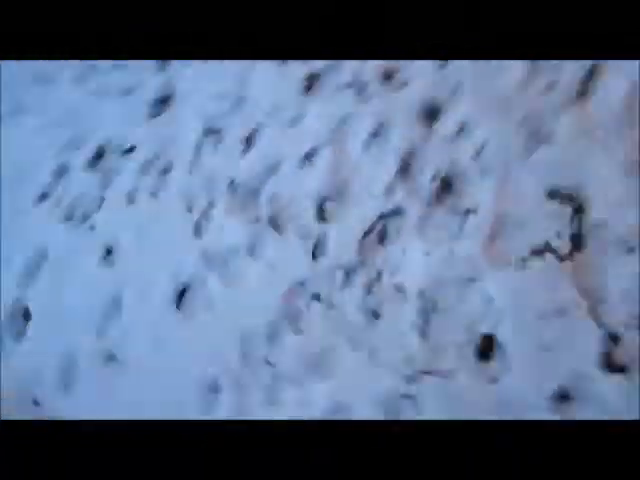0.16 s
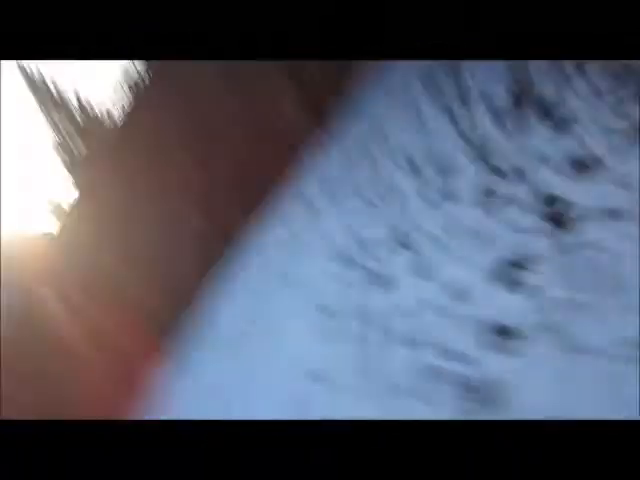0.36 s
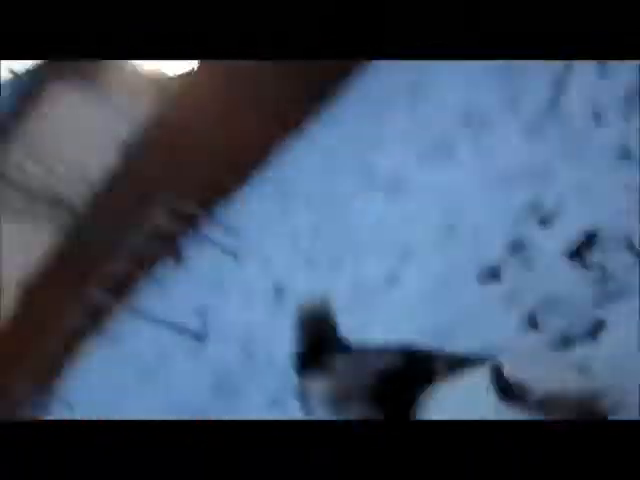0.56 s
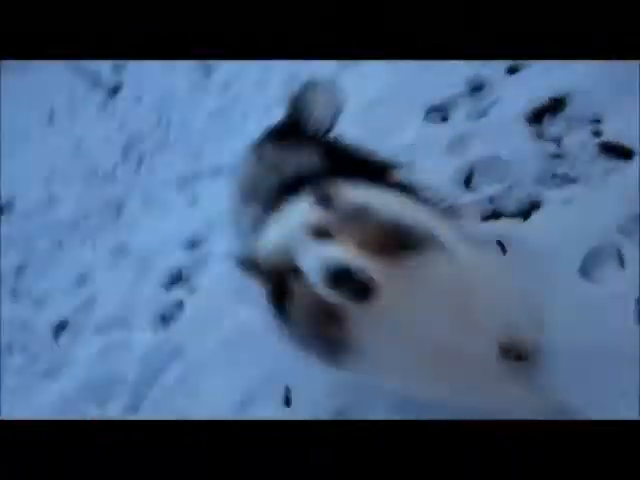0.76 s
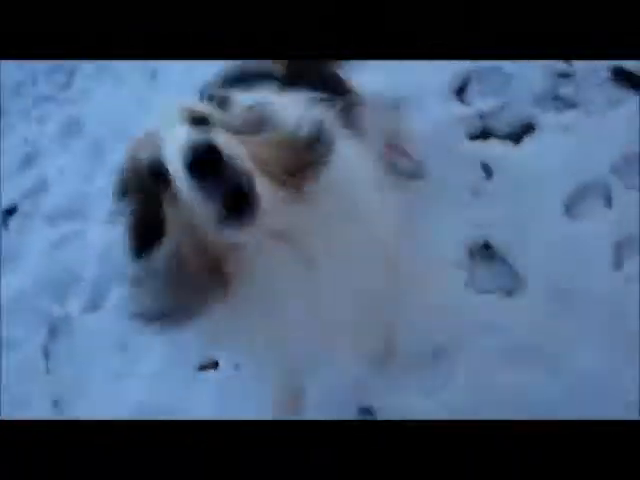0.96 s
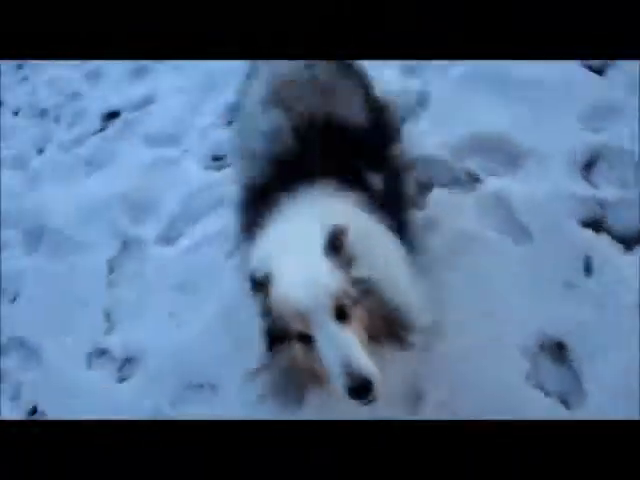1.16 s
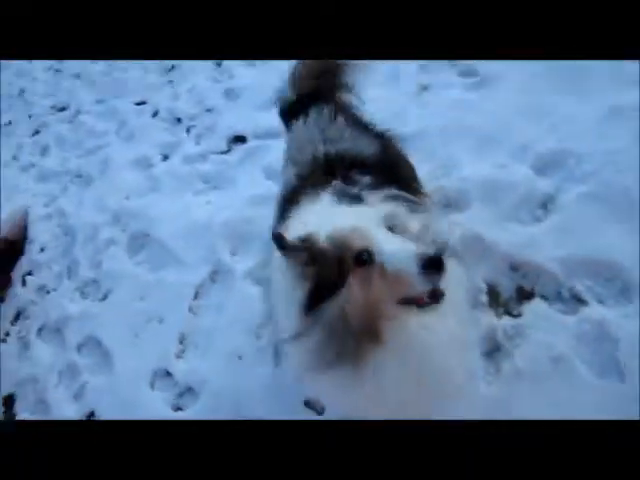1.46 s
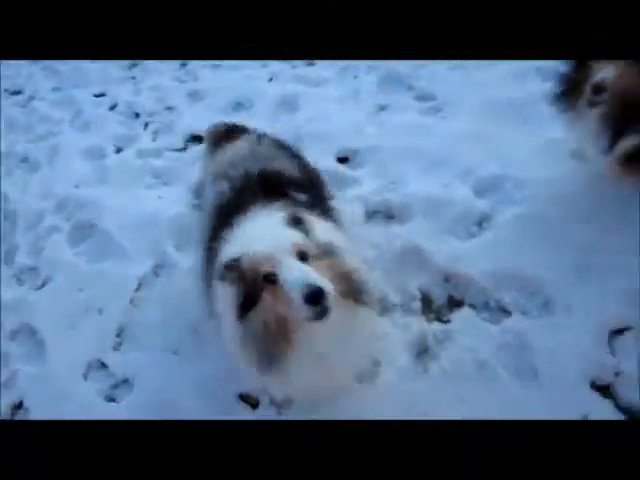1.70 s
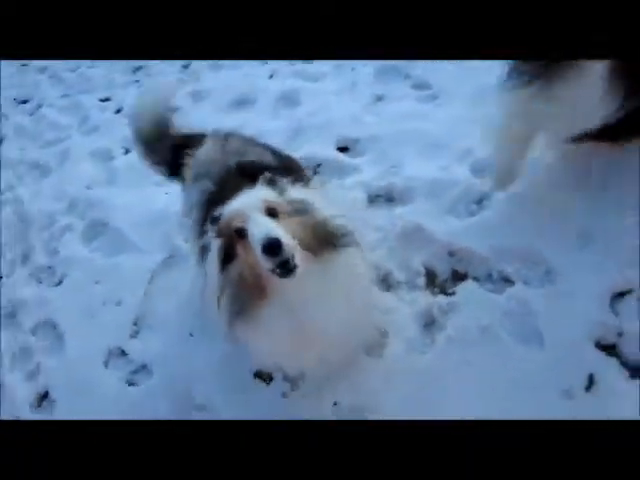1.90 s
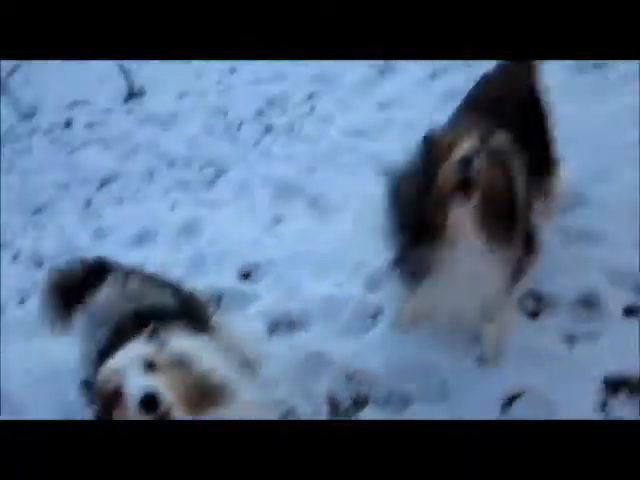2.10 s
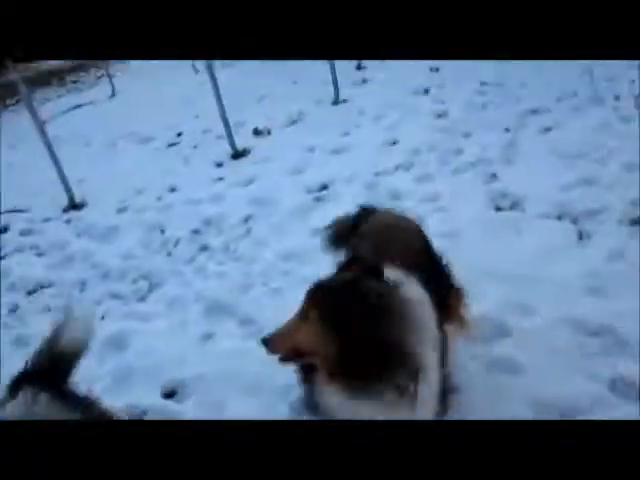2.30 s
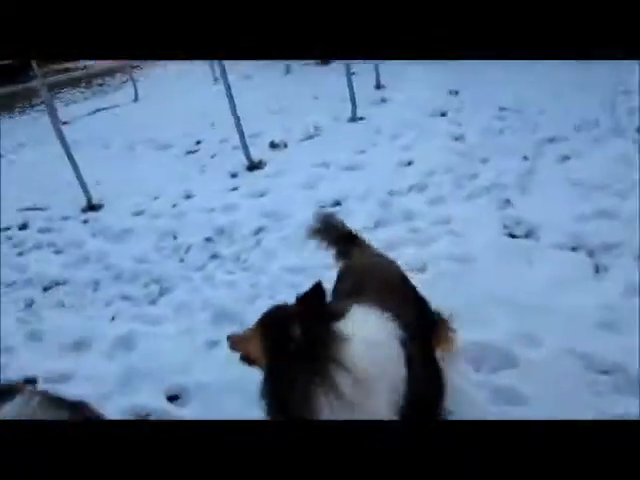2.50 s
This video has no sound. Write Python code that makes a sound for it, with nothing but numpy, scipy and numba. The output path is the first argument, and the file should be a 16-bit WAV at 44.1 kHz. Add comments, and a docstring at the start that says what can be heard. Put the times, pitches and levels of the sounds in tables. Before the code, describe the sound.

Two dogs bark close up in a snowy yard: a round, hooting bark at 0.1 s, answered by a sharper one at 0.25. A crunch at 0.6, a tiny rising whine at 0.8, then overlapping barks at 0.85 and 0.97. Soft knocks at 1.3, paired barks at 1.4 and 1.55, then 2.05 and 2.25. Faint crunching, ticks near 2.0 and 2.46, light echo, quiet air and hum.

```python
"""Two sheepdogs in a snowy yard

Two sheepdogs bark in turn, close to the microphone, the second cutting in on the first; one gives a short whine.
Each bark is a train of glottal pulses on an arch of pitch, roughened by jitter and breath, through a moving mouth.
Grainy noise crunches in short bursts and one longer faint stretch, with soft knocks and sharp ticks of noise.
House and fence send back a faint echo over still air and hum; the loudest barks overload the microphone."""
import sys
import numpy as np
from scipy import signal
from scipy.fft import rfft, irfft
from scipy.io import wavfile
from scipy.ndimage import uniform_filter1d
from numba import njit

SR = 44100
rng = np.random.default_rng(int(sys.argv[2]) if len(sys.argv) > 2 else 0)


def log_audio(samples):
    """Write samples as a 16-bit WAV file to the path given in sys.argv[1]."""
    # one column per channel
    frames = np.atleast_2d(samples).T
    # limit to full scale, then quantise
    limited = np.clip(frames, -1, 1)
    pcm = np.round(limited * 32767).astype(np.int16)
    wavfile.write(sys.argv[1], SR, pcm)


N = 116865
T = np.arange(N) / SR  # time in seconds
TOP_HZ = 15600  # upper limit of the voice harmonics and of the microphone

# Spectrum of the grainy noise, also tints the lingering ring: freq_hz, level_db
GRAIN_COLOUR = [(1200, -1), (8000, -15.5), (15000, -30.5)]
# Spectrum of the sound the yard sends back: freq_hz, level_db
YARD_COLOUR = [(550, -11.5), (1150, -3), (3000, -7), (12000, -10)]


def amp(db):
    """Decibels to gain."""
    return 10 ** (np.asarray(db) / 20)


def unit(x):
    """Scale to rms 1."""
    return x / np.sqrt(np.mean(x ** 2))


def colour(x, points):
    """Causal minimum-phase filter through the given (Hz, dB) points, built by folding the cepstrum."""
    hz, db = np.array(points).T
    size = 2048
    bins_hz = np.arange(size // 2 + 1) * SR / size
    curve_db = np.interp(np.log(bins_hz + 1), np.log(hz), db)
    cepstrum = irfft(np.log(amp(curve_db)))
    cepstrum[1:size // 2] *= 2
    cepstrum[size // 2 + 1:] = 0
    impulse = irfft(np.exp(rfft(cepstrum)))
    return signal.fftconvolve(x, impulse)[:len(x)]


def noise(points):
    """Coloured noise of rms 1."""
    return unit(colour(rng.standard_normal(N), points))


def wobble(hz):
    """Random motion: normal draws at the given rate, joined by straight lines."""
    return np.interp(T * hz, np.arange(N), rng.standard_normal(N))


@njit
def resonate(x, hz, width):
    """State-variable band-pass with a moving centre, gain 1 at the peak; width in Hz."""
    y, band, low = np.empty(len(x)), 0., 0.
    for i in range(len(x)):
        g = np.tan(np.pi * hz[i] / SR)
        damping = width / hz[i]
        v = (band + g * (x[i] - low)) / (1 + g * (g + damping))
        band = 2 * v - band
        low = low + 2 * g * v
        y[i] = damping * v
    return y


def background(air_db=-51.5, hum_db=-65.5, hum_hz=120, linger_db=-40, linger_s=1):
    """Still air, a faint sine hum and the ring of an earlier bark, dying away exponentially."""
    # Spectrum of the still air: freq_hz, level_db
    air_colour = [(100, -11.5), (1500, -5.5), (8000, -24.5), (15000, -31)]
    air = amp(air_db) * noise(air_colour)
    hum = amp(hum_db) * np.sqrt(2) * np.sin(2 * np.pi * hum_hz * T)
    ring = unit(colour(noise(YARD_COLOUR), GRAIN_COLOUR))
    return air + hum + amp(linger_db) * ring * np.exp(-T / linger_s)


def bark(rows, throat, mouth_db, width_hz):
    """Unsteady glottal pulses and breath ring two jaw-led resonances and a thin one that rises through the bark."""
    fade_s = 0.0055
    jitter, shimmer, hiss_db = 0.072, 0.58, 11.5  # pitch and strength wander, hiss, at full roughness
    doubling = 0.25  # strong and weak pulses alternate where the voice is rough
    pressed_db = -5.5  # the fundamental starts weak and fills in as the throat relaxes
    upper_ratio, upper_db = 1.71, -2.5  # second mouth resonance, centre relative to the first
    edge_hz, edge_db = 7600, 11.5  # thin high resonance, where it ends up
    dull_hz = 1900  # the treble of the voice lies above this

    times, *controls = np.array(rows).T
    on = (T > times[0] - fade_s) & (T < times[-1] + fade_s)
    t = T[on]
    remaining = np.interp(t, times[[0, -1]], [1, 0])
    pitch, level_db, rough, mouth, treble_db = (np.interp(t, times, c) for c in controls)
    rough = np.clip(rough, 0, 1)

    # Glottal pulses: a sum of harmonics on a jittering pitch
    unsteady_pitch = pitch * (1 + jitter * rough * wobble(420)[on])
    phase = 2 * np.pi * np.cumsum(unsteady_pitch) / SR
    k = np.arange(1, 48)[:, None]
    strengths = (k * pitch < TOP_HZ) * amp(pressed_db * remaining * (k == 1))
    pulses = unit(np.sum(np.cos(k * phase) * strengths, axis=0))
    pulses = pulses * (1 + doubling * rough * np.cos(phase / 2))
    pulses = pulses * (1 + shimmer * rough * wobble(500)[on])

    # Breath comes in puffs with the pulses; its brighter hiss is weighted toward the start of the bark
    air = rng.standard_normal(N)[on] * (1 + np.cos(phase) / 2)
    hiss = amp(hiss_db) * np.sqrt(rough * remaining) * np.diff(air, prepend=0)
    voice = pulses + rough * np.sqrt(rough) * air + hiss

    # Each resonance is added on top of the sound that enters it
    voice = voice + amp(mouth_db) * resonate(voice, mouth, float(width_hz))
    voice = voice + amp(upper_db) * resonate(voice, mouth * upper_ratio, 2. * width_hz)
    rising_edge_hz = edge_hz * (1 - 0.19 * remaining ** 2)
    voice = voice + amp(edge_db) * resonate(voice, rising_edge_hz, 460.0)
    voice = colour(voice, throat)

    body = signal.sosfiltfilt(signal.butter(4, dull_hz, fs=SR, output="sos"), voice)
    voice = body + amp(treble_db) * (voice - body)

    # Even out the running level, so that the level column alone shapes the loudness
    voice /= np.sqrt(uniform_filter1d(voice ** 2, size=400) + 1e-9)
    fade = np.clip(np.minimum(t - times[0], times[-1] - t) / fade_s + 1, 0, 1)
    out = np.zeros(N)
    out[on] = voice * amp(level_db) * fade
    return out


def round_dog():
    """The dog with a round, hooting voice: a strong, narrow mouth resonance."""
    # One list per bark: time_s, pitch_hz, level_db, roughness (0-1, clipped), mouth_hz, treble_db
    round_barks = [
        [(.112, 271.1, -30.5, 0.62, 550, -17), (.143, 375.4, -11, 0.25, 1040, -10.5),
         (.165, 480, -12, 0.05, 1010, 6.5), (.185, 496.9, -4.5, 0, 1024, -0.5),
         (.225, 506.6, -15.5, 0.11, 940, -4), (.243, 463, -19.5, .3, 833, 13.5), (.28, 246, -34, 0, 388, -20)],
        [(.965, 473, -15, 0, 950, 11.5), (.98, 462.4, -11.5, 0, 995, 1.5), (1.014, 507.2, -17.5, 0, 1240, 1),
         (1.03, 592, -18, 1.1, 780, -2.5), (1.052, 501, -34.5, 0.4, 530, 6.5)],
        [(1.397, 255.6, -32, 0.67, 510, 0), (1.43, 372, -17, 0.23, 973, 0.5),
         (1.458, 481.2, -10, 0.1, 1020, -1), (1.503, 505, -12.5, 0.14, 970, -6),
         (1.514, 496, -14, 0.67, 950, -12), (1.521, 660, -15, 0.35, 650, 5), (1.546, 569, -18.5, 0.2, 580, -14)],
        [(2.042, 262.9, -29, .5, 583, -6), (2.062, 334, -16.5, 0.31, 753, 5), (2.095, 464, -10, 0.14, 928, 4.5),
         (2.138, 489.6, -15, 0.13, 980, -7.5), (2.148, 523, -23, 0.56, 920, 12),
         (2.155, 650, -12.5, 0.27, 700, -5), (2.174, 578, -22, 0.27, 580, 1)],
    ]
    # Fixed colour of this throat: freq_hz, level_db
    round_throat = [(200, -5), (480, 0), (1000, -3), (1400, -8), (1750, -5), (2100, -12), (2450, -5),
                    (2950, -11), (3350, -26), (5500, -41), (9500, -37), (15000, -60)]
    return sum(bark(rows, round_throat, mouth_db=19.0, width_hz=170) for rows in round_barks)


def sharp_dog():
    """The dog with a sharper, harsher voice: a weaker, wider mouth resonance."""
    # One list per bark: time_s, pitch_hz, level_db, roughness (0-1, clipped), mouth_hz, treble_db
    sharp_barks = [
        [(.252, 413.8, -17, 0.099, 1320, -9.5), (.285, 524.5, -18, 0.23, 1740, 0.5),
         (.303, 597, -14.5, 0.17, 970, -5), (.338, 569, -19, 0.34, 756, -4.5), (.358, 458, -35, 1, 560, 5)],
        [(.85, 266.5, -27.5, 0.51, 550, 3.5), (.869, 316.8, -8, 0.22, 626, -12),
         (.877, 385, -14, 0.62, 1480, -13), (.9, 451.2, -9.5, 0.084, 1270, 0.5),
         (.95, 546.5, -7, 0.43, 1435, -11.5), (.962, 499.5, -10.5, 0.23, 530, -6),
         (.986, 360, -30, 0.28, 400, -32)],
        [(1.542, 330, -30.5, 0.47, 810, 6.5), (1.562, 424.6, -7, 0.11, 1330, -8),
         (1.58, 499.5, -13, 0.054, 1900, 1), (1.605, 534.7, -12.5, 0.14, 1110, 5.5),
         (1.636, 554.5, -9.5, 0.085, 970, -9), (1.655, 421, -27, 0.23, 750, 4),
         (1.685, 252, -42.5, 0.21, 511, -12)],
        [(2.245, 281.2, -37, 0.31, 590, -12), (2.264, 316.7, -15, 0.29, 630, -6.5),
         (2.273, 397.1, -17.5, 0.18, 1190, -0.5), (2.29, 467.2, -13.5, 0.24, 1780, -7.5),
         (2.317, 528, -14.5, 0.88, 756, -1.5), (2.329, 540, -10, 0.055, 1080, -16),
         (2.355, 529.5, -12, 0.036, 1020, -30), (2.372, 396.5, -30, 0.42, 840, -6),
         (2.412, 221.5, -45, .05, 300, -19)],
    ]
    # Fixed colour of this throat: freq_hz, level_db
    sharp_throat = [(200, -16.5), (540, 9), (1950, 0.5), (2250, -6.5), (2650, 4.5), (3050, -1.5),
                    (3400, -17), (10000, -26.5), (15000, -63)]
    return sum(bark(rows, sharp_throat, mouth_db=11, width_hz=420) for rows in sharp_barks)


def yard(x, t60_s=1, tail_db=-30):
    """Distinct echoes off house and fence, and a thin diffuse tail of decaying noise."""
    # Reflections from the house, then the fence: delay_s, level_db
    echo_rows = [(0.045, -15.5), (.14, -27)]
    echoes = sum(amp(db) * np.interp(T - s, T, x, left=0) for s, db in echo_rows)
    build_up = np.minimum(T / 0.1, 1)
    tail = noise(YARD_COLOUR) * amp(-60 * T / t60_s) * build_up
    diffuse = signal.fftconvolve(x, tail / np.linalg.norm(tail))[:N]
    return colour(echoes, YARD_COLOUR) + amp(tail_db) * diffuse


def crunches(grain_db=3, edge_s=0.004):
    """Grainy noise, rapidly swinging in level, in short bursts and one longer faint stretch."""
    # Stretches of grainy noise: start_s, length_s, level_db
    crunch_rows = [(0.622, 0.087, -40.5), (1.052, 0.22, -44), (1.646, 0.12, -44.5), (1.974, 0.46, -44.5)]
    level = 0
    for s, length, db in crunch_rows:
        level = level + amp(db) * np.clip(np.minimum(T - s, s + length - T) / edge_s + .5, 0, 1)
    return level * unit(noise(GRAIN_COLOUR) * amp(grain_db * wobble(750)))


def whine(overtone_db=-18):
    """A thin whistle with a weak octave that climbs, then sags slightly."""
    # Course of the whine: time_s, pitch_hz, level_db
    whine_rows = [(0.804, 922, -37.5), (0.83, 1242, -28.5), (0.866, 1182, -29.5)]
    times, hz, db = np.array(whine_rows).T
    phase = 2 * np.pi * np.cumsum(np.interp(T, times, hz)) / SR
    sounding = (T > times[0]) * (T < times[-1])
    level = uniform_filter1d(amp(np.interp(T, times, db)) * sounding, size=256)  # softened ends
    return np.sqrt(2) * level * (np.sin(phase) + amp(overtone_db) * np.sin(2 * phase))


def taps(rows, shape, decay_s):
    """Short contacts: coloured noise that starts at once and decays exponentially."""
    return noise(shape) * sum(amp(db) * (T >= s) * np.exp(-abs(T - s) / decay_s) for s, db in rows)


def knocks():
    """Soft, dull knocks: low-weighted noise dying within a few milliseconds."""
    # Knocks: start_s, level_db
    knock_rows = [(1.317, -28), (1.326, -30), (1.349, -37)]
    # Their spectrum: freq_hz, level_db
    knock_colour = [(200, -30), (720, -15), (12000, -57)]
    return taps(knock_rows, knock_colour, decay_s=0.0061)


def ticks():
    """Small sharp ticks: bright noise dying in about a millisecond."""
    # Ticks: start_s, level_db
    tick_rows = [(2.015, -36), (2.463, -28)]
    # Their spectrum: freq_hz, level_db
    tick_colour = [(8000, -3), (15000, -25)]
    return taps(tick_rows, tick_colour, decay_s=0.0011)


def scene():
    """Dogs and knocks set off the yard's echo; crunches, ticks and background reach the microphone without it."""
    echoing = round_dog() + sharp_dog() + whine() + knocks()
    return (echoing + yard(echoing) + crunches() + ticks() + background())[None]


def record(dry, ceiling=0.56, knee=6, low_hz=70):
    """The microphone flattens the loudest peaks; deep bass and the top are cut."""
    flat = dry / (1 + abs(dry / ceiling) ** knee) ** (1 / knee)
    flat = signal.lfilter(*signal.butter(1, low_hz, "highpass", fs=SR), flat)
    return signal.sosfilt(signal.ellip(8, .2, 80, TOP_HZ, fs=SR, output="sos"), flat)


dry = scene()
out = record(dry)
log_audio(out)
```